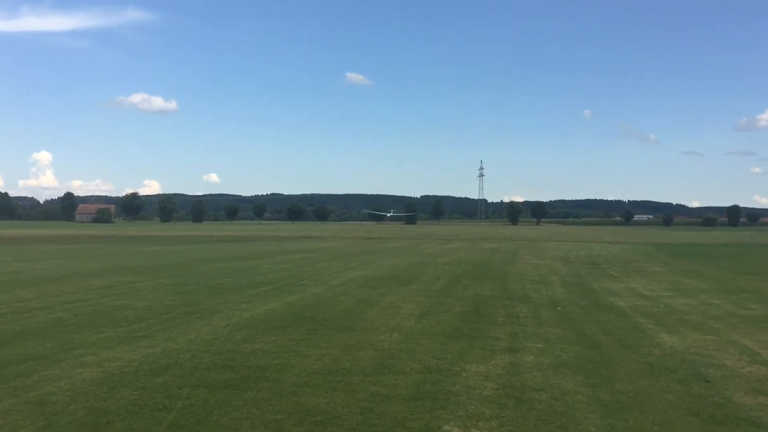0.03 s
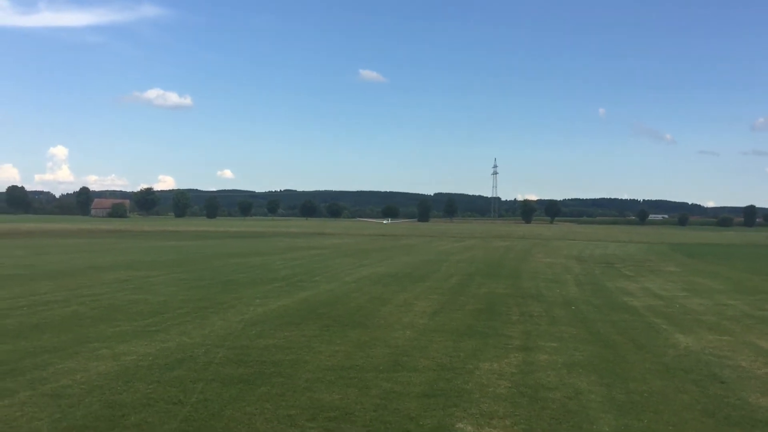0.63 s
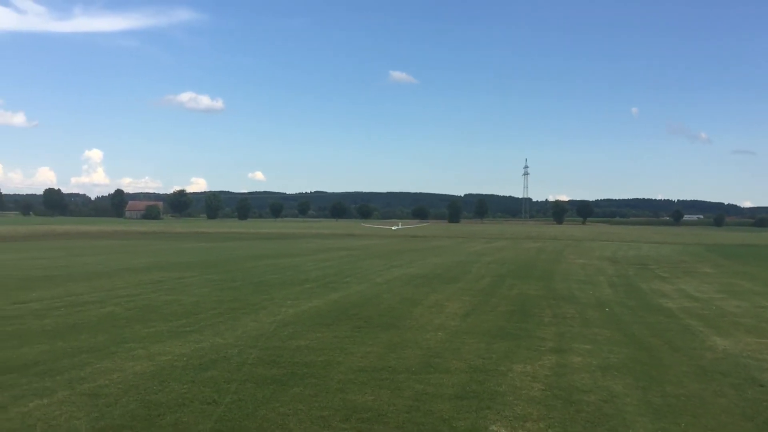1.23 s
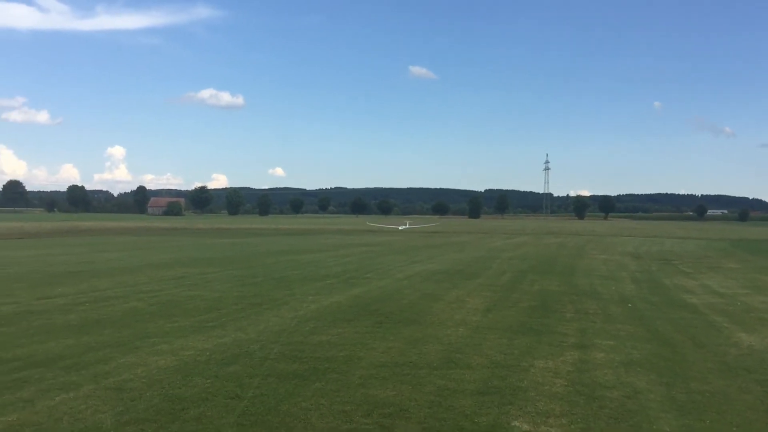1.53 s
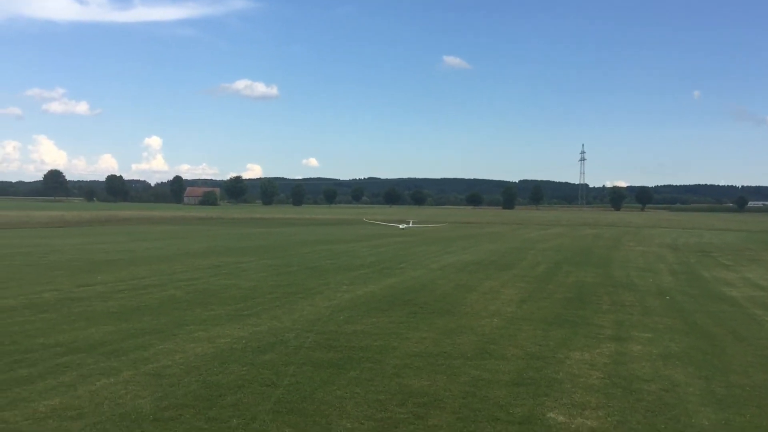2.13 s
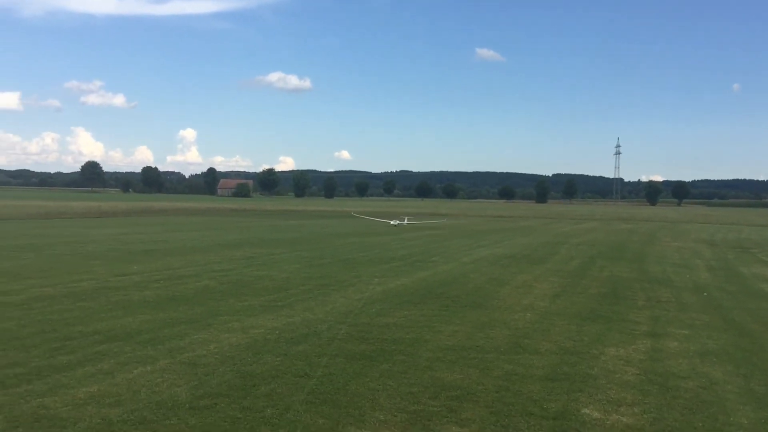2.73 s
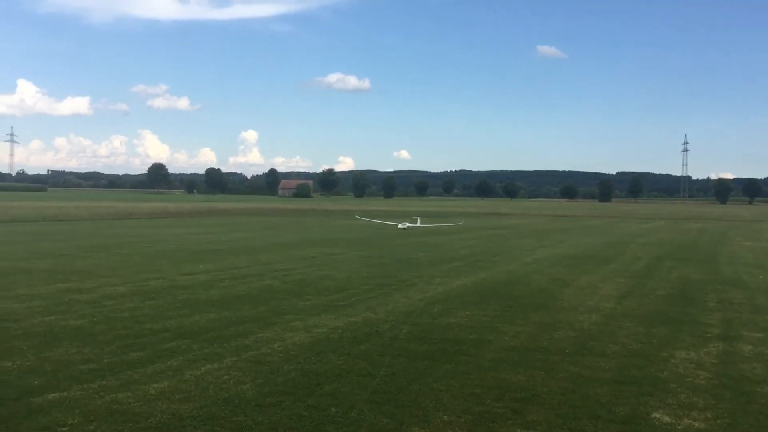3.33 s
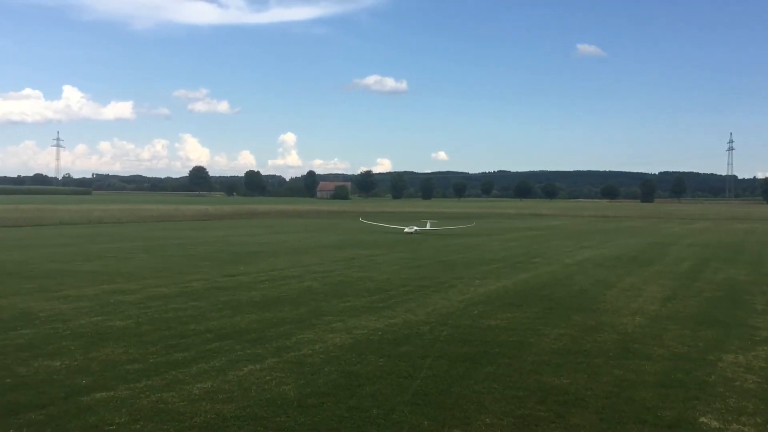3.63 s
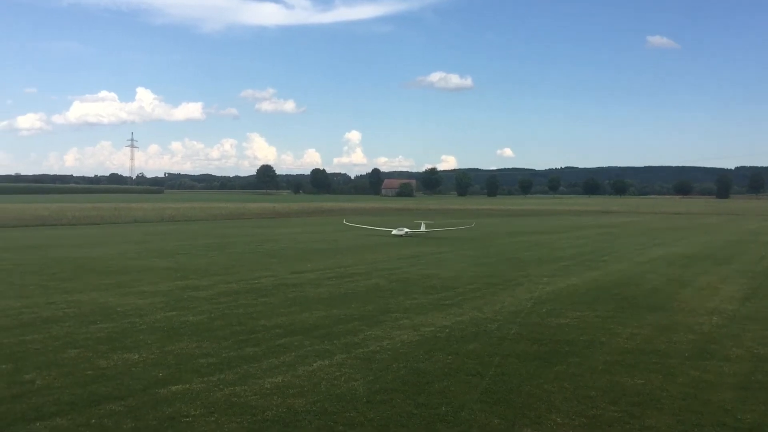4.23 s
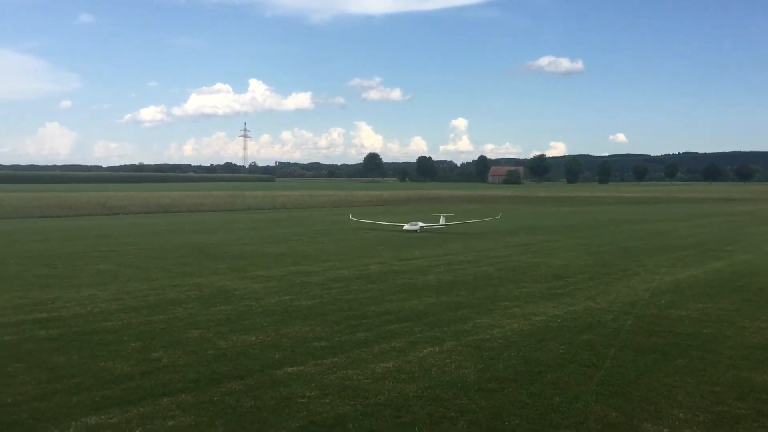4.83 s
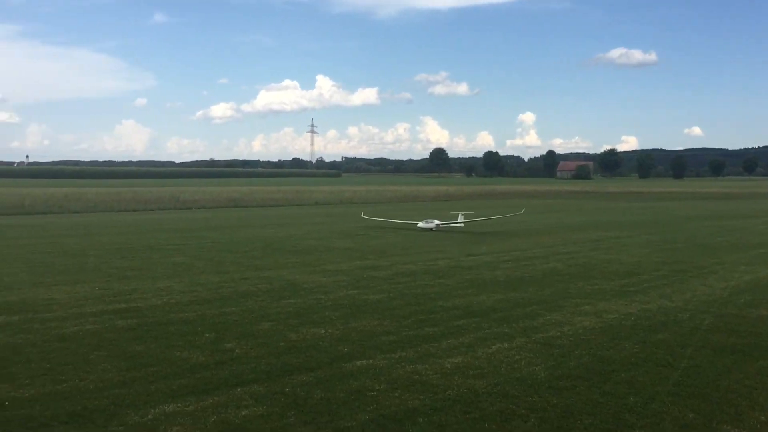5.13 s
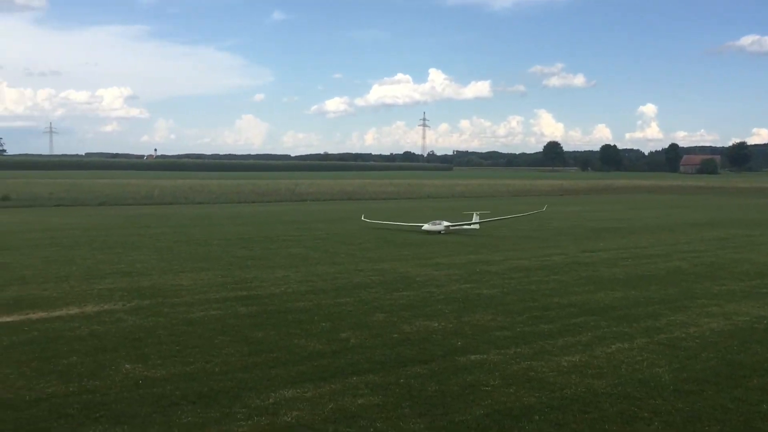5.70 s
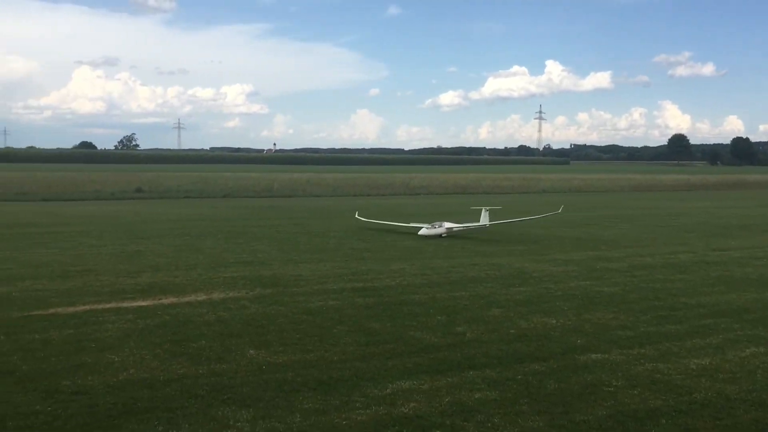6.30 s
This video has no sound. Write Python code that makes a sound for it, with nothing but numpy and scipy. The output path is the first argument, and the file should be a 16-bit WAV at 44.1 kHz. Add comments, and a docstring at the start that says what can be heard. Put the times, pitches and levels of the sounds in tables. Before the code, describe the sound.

On an open airfield, uneven low wind noise buffets the microphone over a faint hush, with stronger gusts after a couple of seconds. Beneath the wind a glider rolls in across the grass, its wheel quietly rumbling and swishing. A short, faint whistle passes, then small rattles and sharper hollow clacks come more often, clearest near the end as the glider approaches.

```python
"""A glider lands on a grass airfield and rolls towards a microphone that stands in gusty wind.
From the start, over the hush of the field and faint swishes, turbulence rumbles and eddies thump on
the microphone port. From 3.1 s the wheel drums and hisses through the grass, louder as it nears, and
bumps make loose fittings clack in the hollow airframe. At 4 s air whistles briefly over the brakes;
from 4.3 s small rattles fill the gaps between the clacks."""
import sys
import numpy as np
from scipy import signal
from scipy.fft import rfft, irfft
from scipy.io import wavfile
from scipy.ndimage import uniform_filter1d

SR = 44100
rng = np.random.default_rng(int(sys.argv[2]) if len(sys.argv) > 2 else 0)


def generate_wav(signal):
    """Clip the signal to [-1, 1] and save it as 16-bit WAV at the path in sys.argv[1]."""
    frames = np.transpose(np.atleast_2d(signal))
    scaled = np.clip(frames, -1, 1) * 32767
    pcm = np.round(scaled).astype(np.int16)
    wavfile.write(sys.argv[1], SR, pcm)


N = 284886
TIME = np.arange(N) / SR


def gain_of(db):
    """Amplitude ratio of a level in decibels."""
    return 10 ** (np.asarray(db) / 20)


def unit_rms(x):
    """Normalisation to an rms of one."""
    return x / np.sqrt(np.mean(x ** 2) + 1e-20)


def bell(t, sigma):
    """Gaussian envelope centred on t = 0."""
    return np.exp(-(t / sigma) ** 2 / 2)


def add(mix, start_s, sound):
    """Superposition of a sound on the mix."""
    part = mix[max(round(start_s * SR), 0):][:len(sound)]
    part += sound[:len(part)]


def colour(x, spectrum, size=8192):
    """Minimum-phase filtering, of unit energy, by a spectrum of (f/Hz, level/dB) points."""
    hz, db = np.transpose(spectrum)
    log_hz = np.log(abs(np.fft.fftfreq(size, 1 / SR)) + 1)
    log_gain = np.log(gain_of(np.interp(log_hz, np.log(hz), db)))
    taps = np.fft.ifft(np.exp(np.conj(signal.hilbert(log_gain)))).real[:size // 2]
    return signal.oaconvolve(x, taps / np.linalg.norm(taps))[:N]


def noise(spectrum):
    """Spectrally shaped Gaussian noise of unit rms."""
    return unit_rms(colour(rng.standard_normal(N), spectrum))


def drift(hz):
    """Random fluctuation of unit rms, low-passed at about hz."""
    low_pass = np.exp(-(np.fft.rfftfreq(N, 1 / SR) / hz) ** 2)
    return unit_rms(irfft(rfft(rng.standard_normal(N)) * low_pass, N))


def steadied(x, seconds):
    """Division by the running rms removes slow swells."""
    window = np.hanning(int(seconds * SR) + 3)
    return x / np.sqrt(signal.oaconvolve(x ** 2, window / window.sum(), "same") + 1e-6)


def narrow_band(hz, width_hz):
    """Random modulation spreads a carrier into a fuzzy whistle."""
    carrier = np.exp(2j * np.pi * np.cumsum(hz * np.ones(N)) / SR)
    return (carrier * (drift(width_hz) + 1j * drift(width_hz))).real


def chance_events(per_s, count=160):
    """Jittered sequence: one random time in each interval, with a normal deviate limited to +-2."""
    times = (np.arange(count) + rng.random(count)) / per_s
    deviates = np.clip(rng.standard_normal(count), -2, 2)
    return [(s, deviate) for s, deviate in zip(times, deviates) if s < N / SR]


# Spectrum of the distant air: f/Hz, relative level/dB
HUSH_SPECTRUM = [(100, 7.5), (480, 0.5), (750, -3), (1200, -5.5), (2100, -7), (2700, -10.5), (4200, -12),
                 (5000, -15.5), (6200, -14), (8000, -18), (9300, -16), (10400, -22), (11600, -18.5),
                 (16000, -22)]
def field(hush_db=-70, patches_db=-89):
    """Ambient noise of open country: a broadband hush with soft bands wandering through its middle."""
    hush = gain_of(hush_db + .5 * drift(3.7)) * noise(HUSH_SPECTRUM)
    patches = sum(gain_of(3 * drift(24)) * narrow_band(hz * np.exp(.18 * drift(4.4)), width_hz=260)
                  for hz in np.linspace(550, 1800, 5))
    return hush + gain_of(patches_db) * patches


# Strength of the wind at the port: t/s, rumble level/dB
GUSTS = [(0, -48.5), (.35, -53.5), (.5, -63.5), (.72, -51), (.99, -54.5), (1.12, -35), (1.26, -45),
         (1.55, -49), (2.08, -46), (2.48, -32.5), (2.72, -40), (3.02, -32.5), (3.38, -44), (3.59, -26),
         (3.78, -48.5), (4.32, -46), (4.68, -38), (4.85, -38.5), (5.43, -33.5), (5.64, -37.5), (5.77, -29),
         (6.17, -38), (6.46, -38.5)]
# Spectra of the coarse and the fine turbulence: f/Hz, relative level/dB
RUMBLE_SPECTRUM = [(15, -37), (25, -26.5), (45, -4), (75, 0.5), (110, -5.5), (160, -12.5), (250, -25),
                   (400, -44.5), (900, -93)]
FINE_SPECTRUM = [(50, -7.5), (110, -7), (190, 7), (300, -3.5), (450, -16.5), (650, -23.5), (1000, -55),
                 (2000, -78.5)]
def wind(lumps_db=4.5, fine_lumps_db=6.5, fine_growth=1.49):
    """Turbulent pressure on the port: both scales surge together, the fine growing faster with wind."""
    level = wind_db(TIME)
    fine_level = -54 + fine_growth * (level + 38)
    lumps = np.minimum(drift(24), 1.35)  # capped peaks, deep lulls
    rumble = steadied(noise(RUMBLE_SPECTRUM), .083) * gain_of(level + lumps_db * lumps)
    fine = steadied(noise(FINE_SPECTRUM), .03) * gain_of(fine_level + fine_lumps_db * lumps)
    return rumble + fine


def wind_db(s):
    """Wind strength, linearly interpolated in level."""
    return np.interp(s, *np.transpose(GUSTS))


# Airy swishes and faint whistles, the broad one near 3.4 s from the glider: t/s, f/Hz, level/dB, Gaussian half-
# width/s, bandwidth/Hz
AIRY_SWISHES = [(0.035, 1690, -74, 0.032, 100), (.65, 2310, -78, .022, 80), (.79, 1614, -76, .033, 90),
                (1.801, 1280, -68, 0.0087, 220), (2.295, 1630, -73.5, 0.022, 70),
                (3.273, 1400, -74.5, .07, 169), (3.36, 1878, -74.5, 0.21, 280),
                (3.967, 1240, -69, .025, 170), (4.14, 1920, -67, 0.025, 190),
                (4.202, 1228, -62, 0.025, 240), (4.736, 2220, -59.5, 0.0063, 249),
                (4.98, 2014, -69, 0.093, 260)]
def swishes():
    """Narrow-band noise under Gaussian envelopes is heard as faint whistles and swishes."""
    return sum(gain_of(db) * bell(TIME - s, sigma) * narrow_band(hz, width_hz)
               for s, hz, db, sigma, width_hz in AIRY_SWISHES)


def weak_eddies(per_s=7, octaves_per_db=.03, sigma_s=.0049):
    """Turbulence scales with the flow: random eddies are louder and brighter in stronger wind."""
    return [(s, wind_db(s) - 2.5 + 1.5 * deviate, 210 * 2 ** (octaves_per_db * (wind_db(s) + 38)), sigma_s)
            for s, deviate in chance_events(per_s)]


# Strong eddies at the port: t/s, level/dB, nominal knee f/Hz, Gaussian half-width/s
STRONG_EDDIES = [(0.787, -37.5, 90, 0.0078), (0.904, -41.5, 100, .005), (1.085, -28.5, 253, 0.0095),
                 (1.165, -22, 265, .0022), (1.202, -31, 170, 0.0041), (1.283, -35.5, 110, .005),
                 (1.377, -37.5, 196, 0.0039), (1.4, -29.5, 115, .0095), (1.832, -27.5, 162, 0.016),
                 (2.21, -34.5, 206, 0.0095), (2.292, -30.5, 176, 0.012), (2.395, -33, 256, 0.0047),
                 (2.418, -30, 288, 0.0076), (2.456, -27.5, 228, 0.0044), (2.533, -21, 245, 0.0094),
                 (2.652, -21.5, 293, 0.0055), (2.75, -27.5, 380, 0.0038), (2.776, -28.5, 94, 0.0057),
                 (2.854, -27, 175, 0.0034), (2.936, -22, 264, 0.0069), (2.948, -29, 383, 0.0075),
                 (3.021, -28, 167, 0.0075), (3.074, -28, 232, 0.0022), (3.087, -28, 95, 0.0051),
                 (3.132, -29.5, 266, 0.011), (3.223, -21, 262, 0.0051), (3.518, -24.5, 180, 0.005),
                 (3.562, -25, 250, 0.0076), (3.602, -23, 207, 0.0056), (3.648, -26.5, 263, 0.0074),
                 (3.794, -32.5, 99, 0.0047), (3.953, -34.5, 163, 0.027), (3.99, -32, 86.5, 0.0032),
                 (4.125, -34, 93, 0.011), (4.244, -21.5, 168, 0.0072), (4.205, -37.5, 168, 0.0074),
                 (4.409, -29, 252, 0.0059), (4.424, -26, 97, 0.0056), (4.566, -19.5, 198, 0.0054),
                 (4.585, -24.5, 250, 0.0045), (4.596, -21.5, 150, 0.0068), (4.726, -32, 109, 0.0058),
                 (4.76, -29.5, 167, 0.0059), (4.878, -27, 97, 0.0045), (4.943, -25, 247, 0.0021),
                 (5.021, -35.5, 335, 0.0046), (5.088, -31, 218, 0.0043), (5.162, -23.5, 196, .0015),
                 (5.198, -26.5, 95, .003), (5.313, -26.5, 226, 0.0046), (5.413, -26, 167, 0.0067),
                 (5.456, -28.5, 283, 0.00097), (5.533, -33, 302, 0.006), (5.546, -21, 100, 0.0053),
                 (5.589, -19, 270, 0.00069), (5.738, -27, 210, 0.002), (5.762, -23, 235, 0.0053),
                 (5.784, -22.5, 213, 0.0095), (5.867, -22, 199, 0.0027), (5.921, -30, 213, 0.0078),
                 (6.007, -15, 187, 0.0089), (6.041, -24.5, 238, 0.0041), (6.097, -29.5, 257, 0.0043),
                 (6.372, -26.5, 133, 0.0052), (6.42, -34, 238, 0.0047)]
def eddies(churn_s=.0045, knee_scale=.85, steepness=1.308, port_hz=85, port_q=.92, size=8192):
    """Each eddy is a pressure impulse wrapped in churning air; the longer it lasts, the more churn."""
    t = (np.arange(size) - size // 2) / SR
    hz = np.fft.rfftfreq(size, 1 / SR)
    ratio = 1j * hz / port_hz
    port = ratio ** 2 / (ratio ** 2 + ratio / port_q + 1)  # this bass cut rings briefly
    out = np.zeros(N)
    for s, db, knee_hz, sigma in STRONG_EDDIES + weak_eddies():
        churn = rng.standard_normal(size) * bell(t, sigma)
        swing = np.exp(2j * np.pi * rng.random()) * rfft(t == 0)
        pressure = swing + (sigma / churn_s) ** 2 * rfft(churn) / np.linalg.norm(churn)
        # turbulence spreads its energy over all scales, falling steeply above the knee
        pressure /= np.sqrt(uniform_filter1d(abs(pressure) ** 2, size=41))
        falloff = np.exp(-(hz / (knee_scale * knee_hz)) ** steepness)
        thump = irfft(pressure * falloff * port) * np.hanning(size)
        rms = np.sqrt(np.sum(thump ** 2) / (.01 * SR))  # energy referred to 10 ms
        add(out, s + t[0], gain_of(db) * thump / rms)
    return out


def nearness(s, end_m=35, end_m_per_s=8.6, braking_m_per_s2=2.6):
    """Spherical spreading: amplitude goes as 1/distance of the braking glider, reaching 1 at the end."""
    left_s = N / SR - s
    return end_m / (end_m + end_m_per_s * left_s + braking_m_per_s2 * left_s ** 2 / 2)


# Spectra of the drumming wheel and the hissing grass: f/Hz, relative level/dB
WHEEL_SPECTRUM = [(200, -10), (550, 3), (770, 3), (1100, 5.5), (1700, -3), (2150, -9), (2500, -6.5),
                  (3200, -23), (6000, -31.5)]
GRASS_SPECTRUM = [(1500, -16.5), (2700, -15), (3200, -5), (3600, 3.5), (4300, -3.5), (5100, 1.5),
                  (6200, -5.5), (8000, -5), (9300, -3), (10400, -11), (11600, -5), (13500, -44),
                  (16000, 2.5)]
# Rough patches of turf: t/s, rise in drumming level/dB, Gaussian half-width/s
ROUGH_TURF = [(3.3, 10, .08), (4.192, 8, 0.047), (4.62, 1.5, 0.075), (4.93, 9.5, 0.037), (5.43, 3, .03),
              (5.941, 4, 0.026), (6.26, 4.5, 0.067)]
def rolling_wheel(touchdown_s=3.08, settle_s=1.67, drum_db=-65.5, hiss_db=-75, stalks_per_s=90):
    """Rolling noise: the wheel drums and flicks stalks in spurts, louder as it takes weight and nears."""
    load = np.clip((TIME - touchdown_s) / settle_s, 0, 1)
    near = nearness(TIME)
    scuff_db = sum(db * bell(TIME - s, sigma) for s, db, sigma in ROUGH_TURF)
    jolts = gain_of(drift(22))
    spurts = gain_of(4 * drift(70))
    flicks = unit_rms(rng.standard_normal(N) * (rng.random(N) < stalks_per_s / SR))
    hiss = unit_rms(colour(spurts * rng.standard_normal(N) + .4 * flicks, GRASS_SPECTRUM))
    drum = unit_rms(colour(spurts * rng.standard_normal(N) + .46 * flicks, WHEEL_SPECTRUM))
    hiss *= near ** .89 * gain_of(hiss_db + .22 * scuff_db)
    drum *= near * gain_of(drum_db + scuff_db)
    return load * jolts * (drum + hiss)


# Resonances and dips of the hollow hull: f/Hz, bandwidth/Hz, relative level/dB
HULL_RESONANCES = [(571, 60, 8), (787, 37, -16.5), (1066, 89, 4), (1370, 14, 4), (1550, 76, 5.5),
                   (1752, 24, 8.5), (2065, 116, 8.5), (2185, 36, 7.5), (2470, 93, -21.5), (2600, 310, 7),
                   (2880, 130, -19.5), (2970, 86, 10), (3180, 63, -6), (3530, 138, 9.5), (4010, 260, 11.5),
                   (4530, 260, 6.5), (5660, 290, 4), (6110, 260, 8), (6770, 490, 6), (8400, 220, 2.5),
                   (11250, 1600, 6)]
def hull(shaking, level_db=-2):
    """Forced vibration: the hull's resonances colour whatever shakes the airframe."""
    for hz, width_hz, db in HULL_RESONANCES:
        band = signal.lfilter(*signal.iirpeak(hz, hz / width_hz, SR), shaking)
        shaking = shaking + (gain_of(db) - 1) * band
    return gain_of(level_db) * shaking


# Clacks on the bumps: t/s, then relative level/dB of the whole, the body, the top treble, the ring
IMPACTS = [(3.296, -52.5, 4, -6, -29), (3.4387, -58.5, 8, -6, -24), (3.617, -48.5, -7, -5, -27),
           (3.6476, -55, -7, -8, -34), (4.3136, -56.5, 5, 0, -21), (4.3325, -60, 2, -1, -27),
           (4.594, -58, 3, 0, -27), (4.611, -56, -17, -6, -24), (4.6349, -59.5, -7, -9, -25),
           (4.787, -60, 6, -6, -27), (4.9619, -52, 7, -3, -29), (5.001, -56, 7, -6, -30),
           (5.0268, -50.5, -8, -3, -19.5), (5.0634, -54.5, 4.5, 4, -27), (5.086, -55.5, -11, 12, -35),
           (5.218, -50, 3.5, -3, -12), (5.2543, -48, -3, 4, -30), (5.2663, -39.5, -1, 0, -29),
           (5.429, -57, -3, -3, -24), (5.4558, -58, 8, 8, -21), (5.4695, -50, 0.5, 2, -19),
           (5.5603, -55.5, 1, -8, -28), (5.6395, -34, 0, -4, -32), (5.667, -56.5, 7, -12, -26),
           (5.876, -41, 0, -3, -18), (5.9565, -50, -6, 0, -27), (6.052, -56.5, 1, -2, -27),
           (6.0673, -55.5, -10, 8, -15), (6.1093, -32.5, 0, -4.5, -35), (6.2195, -54.5, 10, -8, -17),
           (6.243, -57, -10, -9, -27), (6.2578, -38.5, 5.5, 0.5, -25.5), (6.412, -59, -12, -10, -33)]
# Spectra of a clack's bright fittings and low body: f/Hz, relative level/dB
FITTINGS_SPECTRUM = [(1500, 0.5), (3000, -6), (3250, -6.5), (3600, -5), (4300, -2.5), (5200, -4),
                     (6200, -8), (7900, -10.5), (9200, -8.5), (10400, -16), (11700, -11), (13500, -13.5),
                     (15000, -18.5), (17000, -10.5)]
BODY_SPECTRUM = [(200, -41), (520, 3), (800, -1.5), (1100, -4), (1600, -7), (2150, -7.5), (2500, -12),
                 (3200, -33), (6000, -30)]
def clacks(fittings_db=-3, body_db=-7, chatter_t60=.025, ring_t60=.51, top_hz=6000):
    """Impact and damped vibration: loose fittings slide, chatter briefly, and the airframe rings on."""
    lead_s = .04  # the slide begins before the impact
    clock = np.arange(SR // 2) / SR - lead_s
    t = np.maximum(clock, 0)
    attack = 1 - np.exp(-t / .0018)
    scrape = gain_of(-26) * np.exp(-abs(clock) / .011)
    top_shelf = 1 - 1 / (1 + (np.fft.rfftfreq(len(t), 1 / SR) / top_hz) ** 6)  # lifted by hard contacts
    fittings, body = np.zeros((2, N))
    for s, db, weight_db, bright_db, ring_db in IMPACTS + rattles():
        chatter, knock = rng.standard_normal((2, len(t)))
        chatter = irfft(rfft(chatter) * gain_of((bright_db + 2) * top_shelf), len(t))
        haste = 2 ** (bright_db / 16)  # brighter clacks come from smaller parts and stop sooner
        decay_db = -60 * np.maximum(t * haste - .0017, 0) / chatter_t60
        ring = gain_of(ring_db - 60 * t / ring_t60)
        chatter *= scrape + attack * (gain_of(decay_db) + ring)
        knock *= attack * (gain_of(decay_db / 2) + gain_of(5) * ring)
        add(fittings, s - lead_s, gain_of(db + fittings_db) * chatter)
        add(body, s - lead_s, gain_of(db + weight_db + body_db) * knock)
    return colour(fittings, FITTINGS_SPECTRUM) + colour(body, BODY_SPECTRUM)


def brake_whistle(start_s=4.035, hz=1834, sag_hz_per_s=150, level_db=-65, fade_db_per_s=12):
    """Flow tone: air over the brakes whistles, sinking in pitch and level as the glider slows."""
    age = np.maximum(TIME - start_s, 0)
    gate = np.interp(age, np.cumsum([0, .063, .33, .1]), [0, 1, 1, 0])  # attack, hold, release
    tone = steadied(narrow_band(hz - sag_hz_per_s * age, width_hz=110), .087)
    return gate * gain_of(level_db - fade_db_per_s * age) * tone


def rattles(start_s=4.3, per_s=11, level_db=-61, weight_db=2, bright_db=0, ring_db=-30):
    """Random excitation: little bumps shake the fittings, louder by the inverse-distance law."""
    return [(s, level_db + 20 * np.log10(nearness(s)), weight_db, bright_db, ring_db)
            for s, _ in chance_events(per_s) if s > start_s]


def scene():
    """Superposition of the wind at the port, the glider and the field, in one channel."""
    buffeting = wind() + eddies()
    glider = hull(rolling_wheel() + clacks()) + brake_whistle()
    return (buffeting + glider + swishes() + field())[None]


def record(dry, low_cut_hz=39, band_limit_hz=15900):
    """Band limiting: the microphone's bass cut, then a steep low-pass."""
    bass_cut = signal.butter(3, low_cut_hz, "high", fs=SR, output="sos")
    low_pass = signal.firwin(511, band_limit_hz, window=("kaiser", 9), fs=SR)
    return signal.oaconvolve(signal.sosfilt(bass_cut, dry), low_pass[None], "same")


dry = scene()
out = record(dry)
generate_wav(out)
```